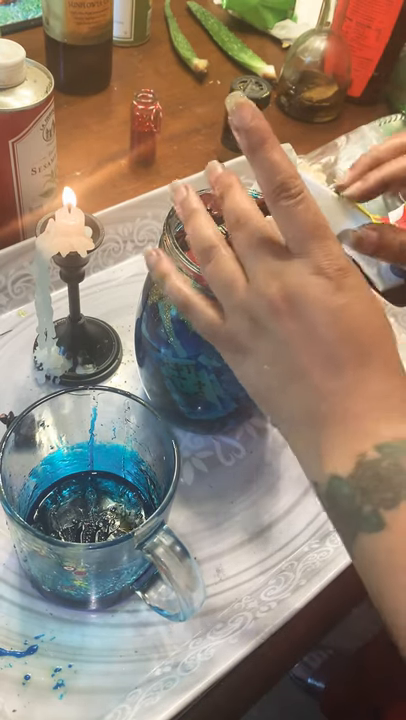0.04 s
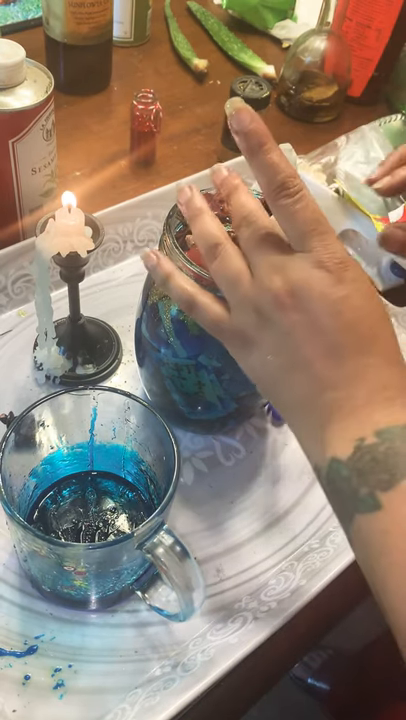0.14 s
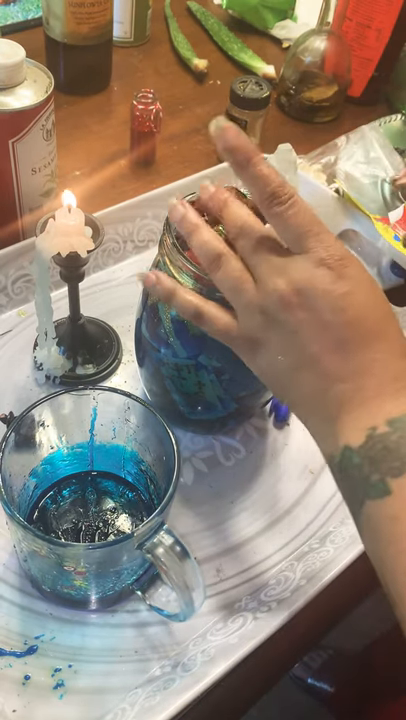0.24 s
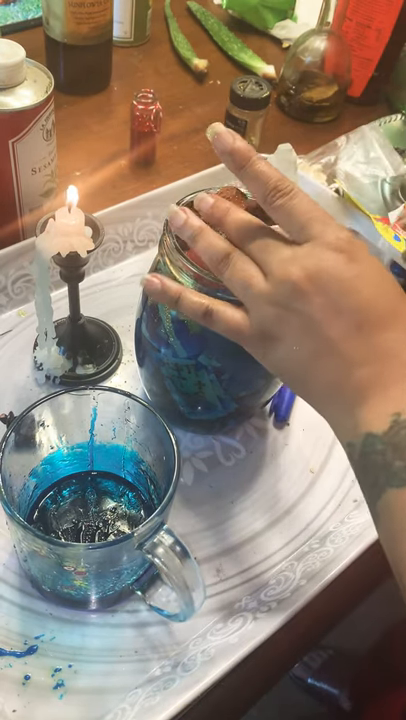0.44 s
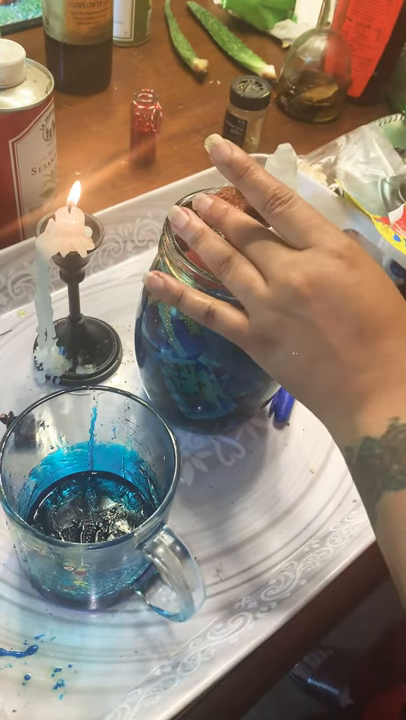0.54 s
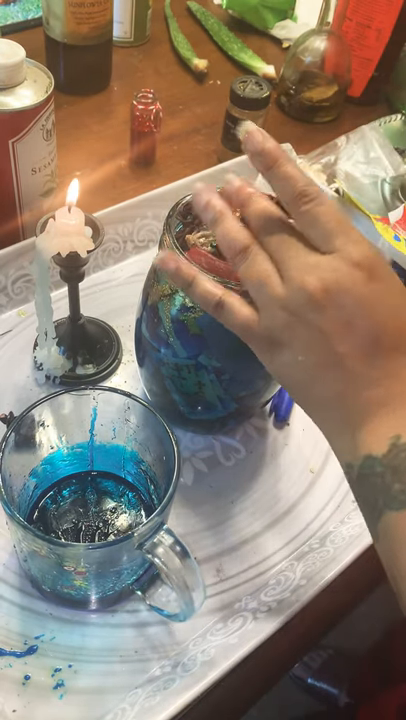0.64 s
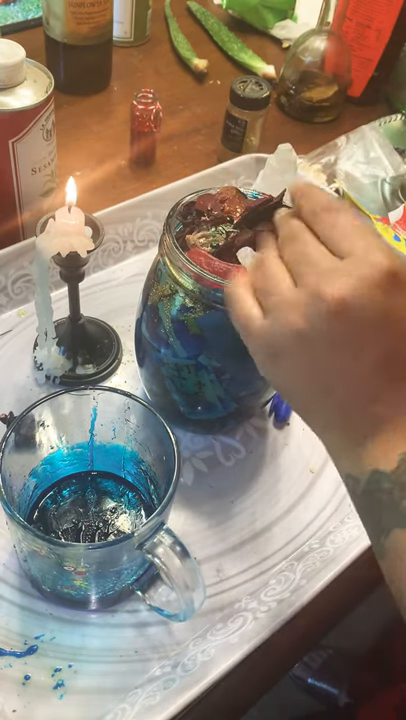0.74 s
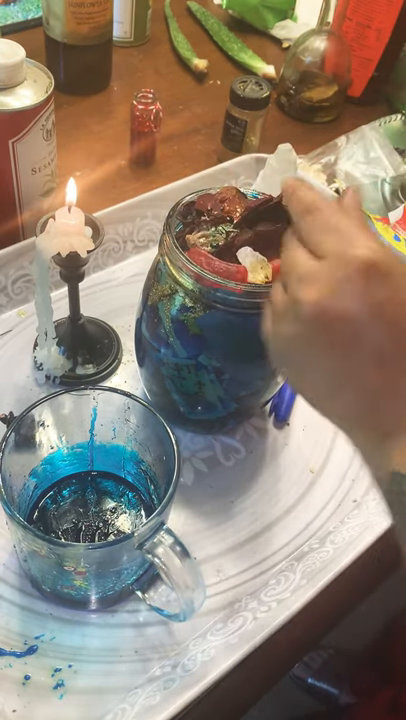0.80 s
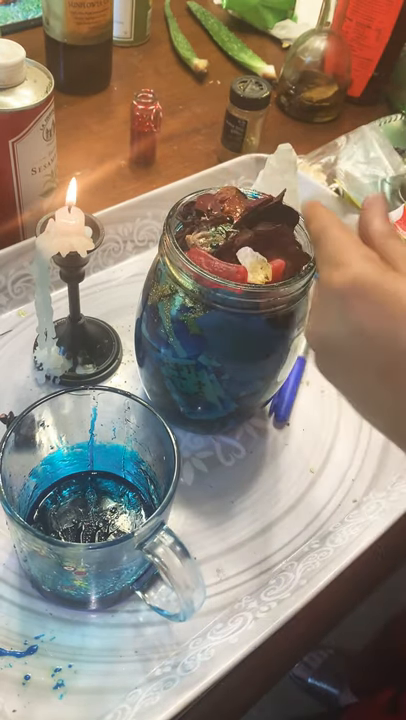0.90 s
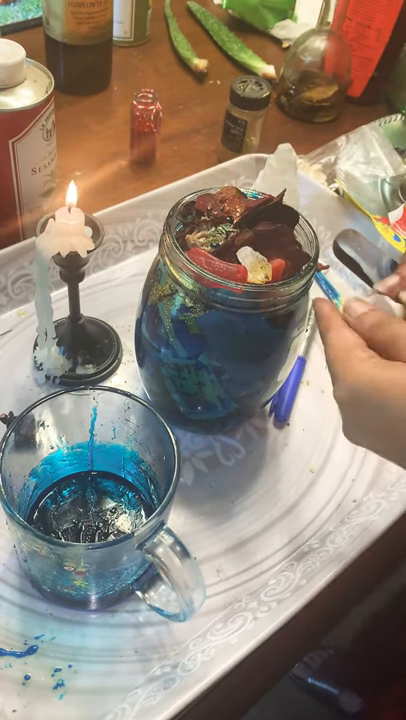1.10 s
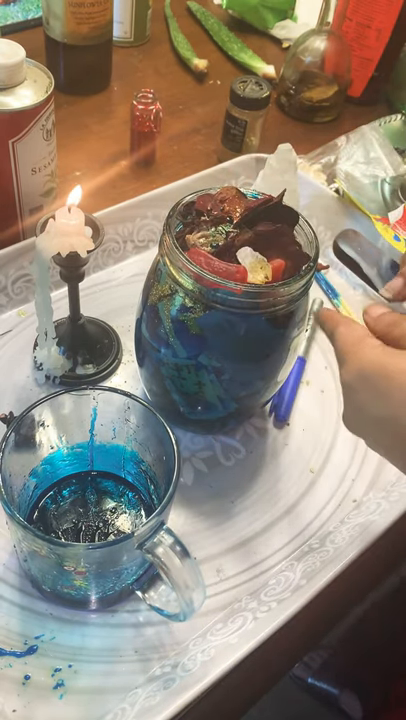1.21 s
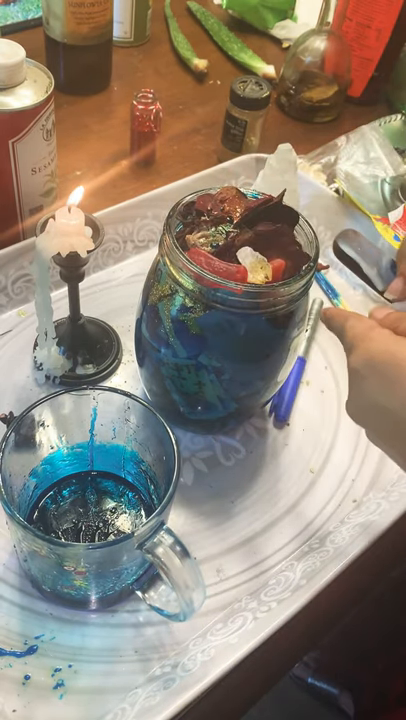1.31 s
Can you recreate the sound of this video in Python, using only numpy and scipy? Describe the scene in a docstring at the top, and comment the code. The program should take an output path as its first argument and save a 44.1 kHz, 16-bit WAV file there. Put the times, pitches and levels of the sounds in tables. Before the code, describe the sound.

Small stones clack against a filled glass jar, heard close in a quiet furnished room. A lighter click comes at the very start, then hard, short clacks at 0.2 to 0.4 seconds, loudest near 0.2 and 0.29, with dense settling rattle and low tray knocks. Faint hand rustling follows around 0.85 to 1.05, with tiny ticks near 0.67 and 0.97, a barely audible squeak at 1.28, over soft rumble and hiss.

```python
"""Small hard stones drop against a filled glass jar on a tray, close to a phone, in a quiet furnished room.
Each clack is a few milliseconds of chattering contact noise that excites the decaying modes of the jar;
jolts ring the tray's low modes, and between the clacks random small knocks are the stones settling.
A hand rustles faintly afterwards: coloured noise of uneven level, with one small sine squeak.
A diffuse decaying tail is the room, and shaped noise with wavering low tones is its rumble and hiss."""
import sys
import numpy as np
from scipy import signal
from scipy.fft import rfft, irfft
from scipy.io import wavfile
from scipy.ndimage import uniform_filter1d

SR = 44100
rng = np.random.default_rng(int(sys.argv[2]) if len(sys.argv) > 2 else 0)


def boost(x):
    """Linear amplitude factor 10**(x/20) for a level x in decibels (scalar or array-like)."""
    u = np.asarray(x, float) / 20
    return 10 ** u


def to_wav(sig):
    """Store sig (one row per channel, or 1-D mono) as 16-bit WAV at the path in sys.argv[1].

    Samples outside -1..1 are clipped; the rate is SR.
    """
    pcm = np.clip(np.atleast_2d(sig), -1, 1) * 32767
    pcm = np.round(pcm).astype(np.int16)
    wavfile.write(sys.argv[1], SR, pcm.T)  # frames by channels


N = 59535  # length in samples


def level(x, db):
    """Root-mean-square normalisation: scale to an rms level in dB."""
    return x * boost(db) / np.sqrt(np.mean(x ** 2) + 1e-20)


def on_log(table, size):
    """Logarithmic frequency axis: read a (Hz, value) table at the bins of an FFT."""
    points = np.array(table, float)
    return np.interp(np.log(np.fft.rfftfreq(size, 1 / SR) + 1), np.log(points[:, 0]), points[:, 1])


def colour(x, table=((1, 0), (SR, 0)), tilt=0.):
    """Linear filtering: a (Hz, dB) response, flat by default, tilted in dB per octave about 2 kHz."""
    size = x.shape[-1]
    octaves = np.log2((np.fft.rfftfreq(size, 1 / SR) + 100) / 2000)
    return irfft(rfft(x) * boost(on_log(table, size) + tilt * octaves), size)


def curve(table):
    """Amplitude envelope: a (s, dB) table as gain, silent outside its span."""
    points = np.array(table, float)
    return boost(np.interp(np.arange(N) / SR, points[:, 0], points[:, 1], left=-200, right=-200))


def walk(rate_hz):
    """Slow random modulation: random levels drawn at a rate and smoothed, with a spread of 1."""
    hold = int(SR / rate_hz)
    steps = np.repeat(rng.standard_normal(N // hold + 1), hold)
    smooth = uniform_filter1d(uniform_filter1d(steps, hold), hold)[:N]
    return smooth / smooth.std()


def partly_alike(shared, separate, alike):
    """Partial coherence: mix shared and separate noise by power, for a likeness of 0 to 1."""
    alike = np.clip(alike, 0, 1)
    return np.sqrt(alike) * shared + np.sqrt(1 - alike) * separate


def drones():
    """Narrow-band noise: a tone of finite bandwidth wavers, as low tones of the building do."""
    # low tones of the building: centre_hz, width_hz (to 1/e in amplitude), level_db
    building_tones = [(49.5, 2.9805, -58.5), (77.8, 8.7, -68), (159.2, 12, -73.5), (248.9, 16, -74)]
    bins_hz = np.fft.rfftfreq(N, 1 / SR)
    out = np.zeros(N)
    for centre_hz, width_hz, level_db in building_tones:
        band = np.exp(-((bins_hz - centre_hz) / width_hz) ** 2)
        out = out + level(irfft(rfft(rng.standard_normal(N)) * band, N), level_db)
    return out


def floor():
    """Stationary ambient noise: rumble and hiss, left and right coherent by frequency, plus drones."""
    # spectrum of the room noise before levelling: freq_hz, gain_db
    floor_colour = [(12, -49.5), (20, -22), (40, -14.5), (70, -14), (117, -24), (244, -22), (400, -28.5),
                    (550, -40.5), (888, -44.5), (1390, -44.5), (4000, -54), (13000, -54.5), (15800, -52),
                    (16300, -67)]
    # likeness of left and right: freq_hz, likeness (0-1)
    floor_alike = [(50, 0.98), (300, 1), (800, .3), (3000, .6), (5000, 1), (16000, .92)]
    noise = rfft(rng.standard_normal((3, N)))
    pair = irfft(partly_alike(noise[0], noise[1:], on_log(floor_alike, N)), N)
    return level(colour(pair, floor_colour), -62.5) + drones()


def room(x):
    """Diffuse reverberation: noise dying exponentially, band by band, partly shared by the two ports."""
    # reverberation time of the room: freq_hz, t60_s
    room_t60 = [(100, 0.46), (400, 0.27), (1500, 0.37), (4000, 0.34), (9000, 0.2), (16000, 0.2)]
    late_db, late_tilt, late_times = -20, -3.5, 2.2  # second decay: dB, dB per octave over 1 kHz, t60 ratio
    tail_db, alike, gap_s = -9.5, 0.76, 0.007  # tail energy, likeness of the ports, time to fade in
    t = np.arange(SR // 2) / SR
    noise = rng.standard_normal((3, len(t)))
    spectrum = rfft(partly_alike(noise[0], noise[1:], alike))
    bin_octave = np.log2(np.fft.rfftfreq(len(t), 1 / SR) + 1)
    points = np.array(room_t60)
    tail = 0
    for octave in np.arange(5, 15.):  # log2 of the centre in Hz; 10 is about 1 kHz
        t60 = np.interp(octave, np.log2(points[:, 0]), points[:, 1])
        band = irfft(spectrum * np.maximum(1 - abs(bin_octave - octave), 0), len(t))
        early = boost(-60 * t / t60)
        late = boost(late_db + late_tilt * max(octave - 10, 0) - 60 * t / t60 / late_times)
        tail = tail + band * (early + late)
    tail = tail * np.minimum(t / gap_s, 1) ** 2
    tail = tail * boost(tail_db) / np.sqrt(np.sum(tail ** 2) / 2)
    return signal.fftconvolve(x[None], tail, axes=1)[:, :N]


def hand():
    """Friction noise: a hand on paper and cloth rustles unevenly; one small squeak is a brief sine."""
    # loudness of the rustle: time_s, level_db
    rustle_levels = [(0.6, -74), (0.8, -108), (0.84, -79), (0.88, -72), (0.92, -80), (0.96, -74),
                     (1.02, -78), (1.07, -92), (1.2, -117), (1.35, -93.5)]
    # spectrum of the rustle: freq_hz, gain_db
    rustle_colour = [(150, -12), (300, -6), (700, 0), (1400, -8), (2400, -5), (3500, -18), (11000, -15),
                     (16500, -32)]
    centre_s, half_s, pitch_hz, squeak_db = 1.275, 0.016, 890, -77
    t = np.arange(N) / SR
    squeak = boost(squeak_db) * np.sin(2 * np.pi * pitch_hz * t) * np.exp(-((t - centre_s) / half_s) ** 2)
    uneven = rng.standard_normal(N) * boost(2.811 * walk(59.98))  # spread in dB, rate in Hz
    return squeak + level(colour(uneven, rustle_colour), 0) * curve(rustle_levels)


def modal_ring(modes):
    """Modal synthesis: decaying sines, each with chance strength, sign and slight detuning."""
    build_cycles = 1.9  # a mode swells over this many of its cycles, so the lows come late
    scatter_db, detune = 2.5, 0.013
    t = np.arange(SR // 2) / SR
    table = np.array(modes)
    pitch_hz, t60_s = table[:, :1], table[:, 2:]
    chance = rng.standard_normal((len(table), 3))
    gains = boost(table[:, 1] + scatter_db * chance[:, 0]) * np.sign(chance[:, 1])
    decay = np.exp(-np.log(1000) * t / t60_s)
    swell = 1 - np.exp(-(t * pitch_hz / build_cycles) ** 2)
    sines = np.sin(2 * np.pi * np.outer(table[:, 0] * (1 + detune * chance[:, 2]), t))
    return gains @ (sines * decay * swell)


def jar_ring():
    """Modal response of a filled vessel: one blow's ring of the jar."""
    # modes of jar and contents: pitch_hz, gain_db, t60_s
    jar_modes = [(494, -10, 0.062), (644.5, -9, 0.048), (742.6, -5, .04), (877, -2, 0.024),
                 (969, -3, 0.028), (1109, -7.5, 0.027), (1290.2, -6.5, 0.033), (1480.7, 3, 0.02),
                 (1618, -34, .65), (1770, -4, 0.011), (1888, -3, 0.032), (2274, -2, 0.015),
                 (2594, -16.5, 0.038), (3762, -17, 0.044)]
    return modal_ring(jar_modes)


def contact_colour(x, tilt):
    """Contact spectrum: hard impacts radiate a bright, broad crack."""
    # colour of the contact: freq_hz, gain_db
    contact_response = [(180, -50.5), (300, -24.5), (1500, -12.5), (5400, -10.5), (8000, -13),
                        (11400, -14.5), (13000, -20), (15300, -12), (16600, -31.5)]
    return colour(x, contact_response, tilt)


def tray():
    """Impulse excitation: jolts passed through the jar ring the low modes of the tray."""
    # low modes of the tray: pitch_hz, gain_db, t60_s
    tray_modes = [(155.4, -7.5, 0.084), (202, -4, 0.13), (258, -6, .1), (287.4, -2.5, 0.08),
                  (369.6, 2.5, 0.071)]
    # jolts the tray gets through the jar: start_s, gain_db
    tray_jolts = [(0.013, -49), (0.206, -22.5), (0.222, -24.5), (0.263, -39), (0.29, -28), (0.305, -29.5),
                  (0.375, -44), (0.4, -44.5)]
    out = np.zeros(N + SR)
    for start_s, gain_db in tray_jolts:
        i = int(start_s * SR)
        out[i:i + SR // 2] += boost(gain_db) * modal_ring(tray_modes)
    return out[:N]


def rattle():
    """Poisson-like impacts: dense small knocks of settling, each at one of six spots on the jar."""
    # settling of the stones: time_s, gain_db
    settling = [(0.207, -38), (0.225, -27), (0.25, -41), (0.28, -30.5), (0.3, -34), (0.33, -33.5),
                (0.36, -38.5), (0.385, -35.5), (0.405, -37.5), (0.425, -52.5), (0.45, -65.5)]
    knocks_per_s, spread_db, spots = 1000, 2.6, 6
    crack_tilt, ring_tilt, ring_db = -4, -1, 6  # dB per octave twice, then ring over crack in dB
    chance = rng.random((N, 3))
    strength = boost(-spread_db * np.log(chance[:, 1] + 1e-9)) * np.sign(rng.standard_normal(N))
    knocks = level((chance[:, 0] < knocks_per_s / SR) * strength, 0) * curve(settling)
    crack = contact_colour(knocks, crack_tilt)
    spot = (chance[:, 2] * spots).astype(int)
    ring = sum(signal.fftconvolve(knocks * (spot == k), jar_ring())[:N] for k in range(spots))
    ring = colour(ring, tilt=ring_tilt)
    size = np.std(knocks)
    return crack * size / np.std(crack) + boost(ring_db) * ring * size / np.std(ring)


def chattering(chatter_ms):
    """Contact noise: a noise burst under a quick rise and Gaussian fall, its spectrum made flat."""
    t = np.arange(2048) / SR
    shape = np.minimum(t / .0004, 1) * np.exp(-(t / (max(chatter_ms, .3) / 1000)) ** 2)
    chatter = rng.standard_normal(len(t))
    for _ in range(4):  # even out its spectrum while keeping its length
        envelope = np.sqrt(uniform_filter1d(chatter ** 2, size=16) + 1e-12)
        spectrum = rfft(chatter * shape / envelope)
        chatter = irfft(spectrum / np.abs(spectrum + 1e-12))
    return chatter * shape ** .25


def blow(chatter_ms, tilt, ring_db):
    """Source and resonator: chattering contact cracks and drives the jar's modes; peak near 1."""
    crack_gain_db, ring_gain_db = 0.5, -10.5
    ring_tilt = 3.3  # dB per octave: sharp blows favour the upper modes
    chatter = chattering(chatter_ms)
    crack = contact_colour(chatter, tilt)
    modes = colour(jar_ring(), tilt=ring_tilt)
    ring = signal.fftconvolve(chatter, modes)[:SR // 2]
    out = boost(ring_gain_db + ring_db) * ring * np.std(modes) / np.std(ring)
    crack_rms = np.sqrt(np.sum(crack ** 2) / (chatter_ms * SR / 1000))
    out[:len(chatter)] += boost(crack_gain_db) * crack / crack_rms / 2
    return out


def clacks():
    """Superposition of impacts: the loud clacks, then faint ticks of 1 ms with a weaker ring."""
    # clacks: start_s, peak_db (nominal), chatter_ms, tilt_db_per_octave, ring_db
    clack_table = [(0.013, -28, 1.7, 1.5, -2), (0.2051, -5.5, 4.15, -3, 6), (0.2093, -12.5, 0.5, -4.5, 9),
                   (0.2623, -13.5, 3, -0.5, 11.5), (0.288, -5, 3.5, 1.5, 4), (0.333, -16, 1.9, -1.5, -1),
                   (0.3742, -16.5, 3.4, -1.5, 0.5), (0.3984, -23.5, 2.1, -3.5, -13)]
    # faint ticks: start_s, peak_db (nominal), tilt_db_per_octave
    tick_table = [(0.669, -61, 6), (0.965, -64, -3)]
    ticks = [(start_s, peak_db, 1., tilt, -6.) for start_s, peak_db, tilt in tick_table]
    out = np.zeros(N + SR)
    for start_s, peak_db, chatter_ms, tilt, ring_db in list(clack_table) + ticks:
        i = int(start_s * SR)
        out[i:i + SR // 2] += boost(peak_db) * blow(chatter_ms, tilt, ring_db)
    return out[:N]


def stones():
    """Radiation efficiency: small things radiate no bass, so all the impacts are high-passed at 110 Hz."""
    low_cut = signal.butter(3, 110, "high", fs=SR, output="sos")
    return signal.sosfilt(low_cut, clacks() + tray() + rattle())


def scene():
    """Direct sound, its reverberation and the ambient noise, superposed."""
    near = stones() + hand()
    return near + room(near) + floor()


def band_limit(x):
    """A steep low-pass at the top of the band."""
    return signal.sosfilt(signal.butter(12, 16970, fs=SR, output="sos"), x)


def record(dry):
    """Interchannel phase: two ports whose phase parts with frequency, then a steep top cut."""
    # phase by which the left port leads: freq_hz, phase_rad
    port_phase = [(0, 0), (860, -.3), (1550, 0), (3300, 1.2), (5000, 3.14), (16000, 19.9), (22050, 29)]
    points = np.array(port_phase)
    lead = np.interp(np.fft.rfftfreq(2 * N, 1 / SR), points[:, 0], points[:, 1])
    turn_apart = np.exp(.5j * np.outer([1, -1], lead))  # half the lead each way
    ports = irfft(rfft(dry, 2 * N) * turn_apart, 2 * N)[:, :N]
    top_cut = signal.cheby2(6, 50, 17000, fs=SR, output="sos")  # 50 dB down from 17 kHz
    return band_limit(np.clip(signal.sosfilt(top_cut, ports), -1, 1))


dry = scene()
out = record(dry)
to_wav(out)
```